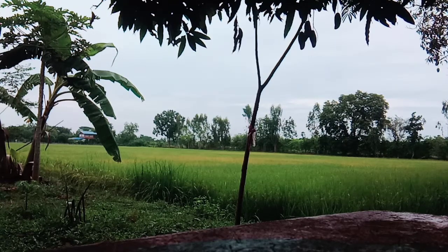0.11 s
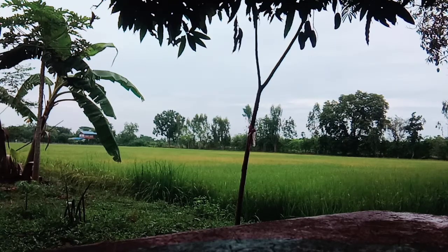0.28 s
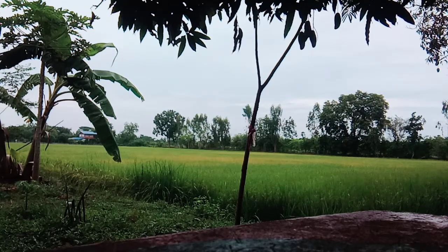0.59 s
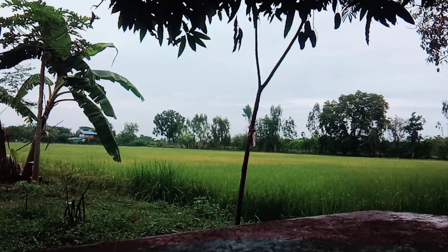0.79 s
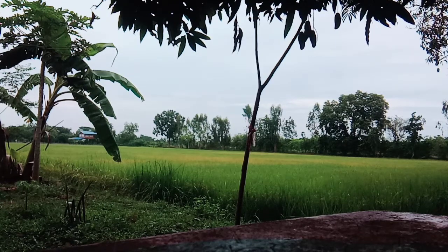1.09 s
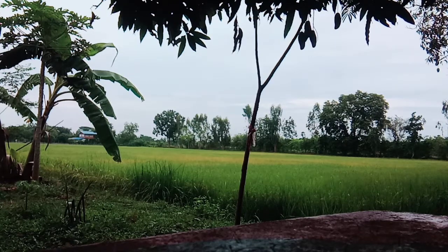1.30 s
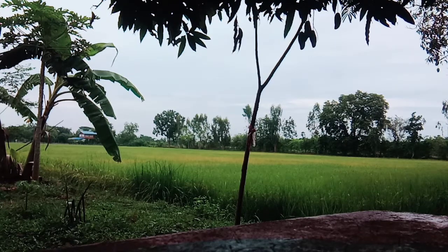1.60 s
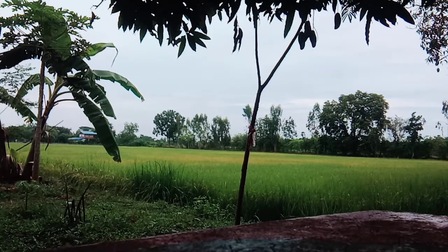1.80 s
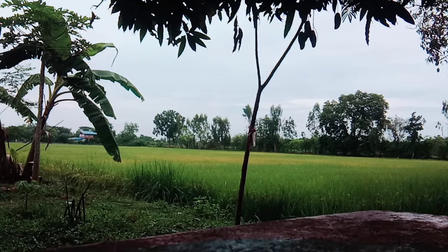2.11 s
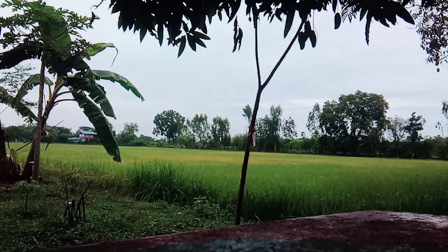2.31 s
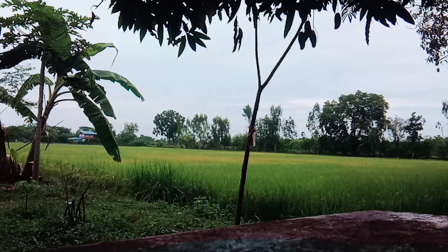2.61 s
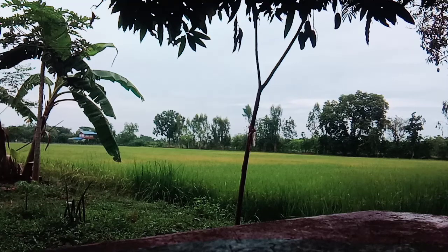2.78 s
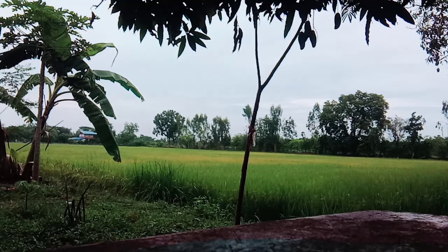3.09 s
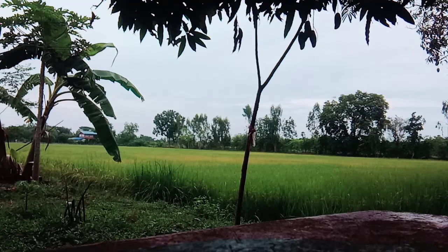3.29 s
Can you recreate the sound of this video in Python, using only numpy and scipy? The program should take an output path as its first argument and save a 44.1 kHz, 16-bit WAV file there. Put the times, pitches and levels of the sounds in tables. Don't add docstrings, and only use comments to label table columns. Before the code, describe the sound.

Sharp trilled bird chirps, four times, with far birds, doves and insects across open farmland.

```python
import sys
import numpy as np
from scipy import signal
from scipy.fft import rfft, irfft, next_fast_len
from scipy.io import wavfile
from scipy.ndimage import uniform_filter1d

SR = 44100
rng = np.random.default_rng(int(sys.argv[2]) if len(sys.argv) > 2 else 0)


def digitize_waveform(pressure):
    field = np.atleast_2d(pressure).T
    bounded = np.clip(field, -1, 1)
    quanta = np.round(bounded * 32767).astype(np.int16)
    wavfile.write(sys.argv[1], SR, quanta)


def decibels_to_gain(level_db):
    exponent = np.asarray(level_db, float) / 20
    return 10 ** exponent


N = 152145
TIME_S = np.arange(N) / SR


def walk(rate_hz):
    hold = int(SR / rate_hz)
    steps = np.repeat(rng.standard_normal(N // hold + 1), hold)
    return 1.3 * uniform_filter1d(uniform_filter1d(steps, hold), hold)[:N]


def set_level(x, db):
    return x * decibels_to_gain(db) / np.sqrt(np.mean(x ** 2))


def noise_band(hz, width_hz):
    f = np.fft.rfftfreq(next_fast_len(N), 1 / SR)
    re, im = rng.standard_normal((2, len(f)))
    bell = np.exp(-np.abs((f - hz) / width_hz) ** 2)
    return set_level(irfft((re + 1j * im) * bell)[:N], 0)


SHAKE, WOBBLE, HOARSE = walk(500), walk(300), walk(5000)
TRILL_PER_S = 225
TRILL = 2 * np.pi * np.cumsum(TRILL_PER_S * (1 + .2 * walk(100))) / SR


def even_glide(from_hz, to_hz):
    return lambda u: from_hz + (to_hz - from_hz) * u


def add_note(out, start_s, length_s, glide, db, edge=0.84, rasp=0., over_db=(), wobble_hz=0., trill=0.):
    trill_hz, trill_depth, trill_fade, hoarse_db = 290, .6, .5, -21.5
    i = int(max(start_s, 0) * SR)
    u = np.arange(min(int(length_s * SR), N - i)) / (length_s * SR)
    part = slice(i, i + len(u))
    beat = trill * (1 - trill_fade * u)
    pitch_hz = glide(u) + wobble_hz * WOBBLE[part] + trill_hz * beat * np.sin(TRILL[part])
    phase = 2 * np.pi * np.cumsum(pitch_hz) / SR
    shake = 1 + rasp * SHAKE[part] + trill_depth * beat * np.cos(TRILL[part])
    shake = shake + trill * decibels_to_gain(hoarse_db) * HOARSE[part]
    tone = np.sin(phase)
    for k, overtone_db in enumerate(over_db):
        tone = tone + decibels_to_gain(overtone_db) * np.sin((k + 2) * phase)
    fade = np.sin(np.pi / 2 * np.clip(np.minimum(u, 1 - u) / edge, 0, 1))
    out[part] += np.sqrt(2) * decibels_to_gain(db) * fade * shake * tone


def sing(notes, rasp, edge, wobble_hz):
    out = np.zeros(N)
    for start_s, length_s, from_hz, to_hz, db in notes:
        add_note(out, start_s, length_s, even_glide(from_hz, to_hz), db, edge, rasp, wobble_hz=wobble_hz)
    return out


def trees(x, wet_db, t60_s=.3):
    gap_s = 0.0045
    t = np.arange(SR // 2) / SR
    tail = rng.standard_normal(SR // 2) * decibels_to_gain(-60 * t / t60_s) * (t > gap_s)
    return x + signal.fftconvolve(x, tail * decibels_to_gain(wet_db) / np.sqrt(np.sum(tail ** 2)))[:N]


# start_s, lead_in_level_db
CHIRP_CALLS = [(0.315, -51.5), (1.364, -54.5), (2.093, -55), (3.012, -57.5)]
# start_s, length_s, from_hz, to_hz, level_db
CHIRP_FLICKS = [
    [(.313, 0.018, 4580, 4680, -42), (.328, .012, 4630, 5080, -36.5), (.343, 0.0082, 4860, 5040, -34),
     (.348, 0.0094, 3930, 4110, -41.5), (.3625, 0.019, 4595, 4566, -32), (.388, 0.037, 2916, 3573, -46)],
    [(1.364, .012, 4380, 5000, -52), (1.374, 0.008, 4540, 4600, -39), (1.387, 0.029, 4970, 4640, -41.5),
     (1.401, 0.025, 3546, 4100, -42), (1.414, 0.018, 4470, 4560, -34.5), (1.437, 0.0414, 3060, 3590, -45.5)],
    [(2.094, 0.022, 4620, 5000, -36.5), (2.11, 0.017, 5000, 5310, -34), (2.131, .016, 3840, 4520, -41.5),
     (2.144, 0.024, 4854, 4510, -35.5), (2.169, 0.041, 3155, 3630, -47.5)],
    [(3.015, 0.016, 4380, 4710, -44.5), (3.028, 0.021, 5040, 4980, -35), (3.047, .029, 3790, 4650, -39),
     (3.082, 0.013, 3060, 3400, -48), (3.098, 0.023, 3445, 3694, -42)],
]
# seconds_before_start, length_s, from_hz, to_hz, level_db (against lead_in_level_db)
LEAD_IN = [
    (.024, .015, 7600, 6900, -5),
    (.012, .012, 6800, 6200, -4),
    (.006, .018, 5350, 5800, 1),
]
# pitch_hz, width_hz, boost_db
BEAK = [(4560, 75, 1), (3500, 20, 7.5), (4990, 180, -9.5)]


def chirper():
    full_trill_hz, least_trill = 600, .5
    total = 0
    for (call_s, lead_db), flicks in zip(CHIRP_CALLS, CHIRP_FLICKS):
        call = np.zeros(N)
        for early_s, length_s, from_hz, to_hz, db in LEAD_IN:
            add_note(call, call_s - early_s, length_s, even_glide(from_hz, to_hz), lead_db + db,
                     rasp=.6, wobble_hz=200, trill=1)
        for start_s, length_s, from_hz, to_hz, db in flicks:
            trill = np.clip(abs(to_hz - from_hz) / full_trill_hz, least_trill, 1)
            add_note(call, start_s, length_s, lambda u: to_hz + (from_hz - to_hz) * np.exp(-2.5 * u), db,
                     edge=.2, rasp=.6 * trill, over_db=(-49, -48), wobble_hz=170 * trill, trill=trill)
        total = total + trees(call, -.4, t60_s=0.26)
    f = np.fft.rfftfreq(N, 1 / SR)
    beak_db = sum(db / (1 + ((f - hz) / width) ** 2) for hz, width, db in BEAK)
    return irfft(rfft(total) * decibels_to_gain(beak_db), N)


# start_s, length_s, from_hz, to_hz, level_db
NEAR_DOVE = [(1.515, .04, 1060, 1170, -54), (1.538, .035, 950, 955, -45), (1.553, .13, 1212, 1195, -43),
             (1.675, .085, 1185, 1120, -46), (1.778, .035, 950, 950, -49), (1.77, .045, 1190, 1060, -50),
             (1.82, .04, 1110, 1110, -46), (1.872, .03, 950, 960, -48), (1.874, .072, 1135, 1145, -43),
             (1.946, .055, 1130, 1010, -45), (1.99, .04, 980, 945, -49)]


def near_dove():
    return trees(sing(NEAR_DOVE, rasp=0.06, edge=0.078, wobble_hz=9.9), -6.5)


# start_s, length_s, top_hz, level_db
PIPER = [(.005, 0.02, 1126, -54.5), (0.082, 0.029, 1120, -53.5), (0.188, 0.061, 1202, -53),
         (0.328, 0.078, 1242, -54), (0.504, 0.097, 1220, -55.5), (0.707, 0.1, 1232, -54),
         (0.899, 0.12, 1227, -56), (1.096, 0.16, 1210, -54), (1.32, 0.13, 1234, -58)]


def piper():
    arch = .17
    out = np.zeros(N)
    for start_s, length_s, top_hz, db in PIPER:
        add_note(out, start_s, length_s, lambda u: top_hz * (1 - arch * (2 * u - 1) ** 2), db, edge=.2, rasp=.1)
    return trees(out, -8)


# start_s, length_s, from_hz, to_hz, level_db
WHISTLER = [(.75, 0.058, 3850, 3920, -59), (.81, 0.1, 3810, 3500, -66), (.91, 0.032, 2520, 2773, -54.5),
            (.95, 0.05, 2765, 2837, -55.5), (1.12, 0.13, 2190, 2360, -58.5), (1.2, 0.06, 2447, 2900, -56),
            (1.39, 0.047, 2335, 2330, -52.5), (1.47, 0.05, 2397, 2770, -52),
            (1.53, 0.082, 2786, 2710, -59.5), (1.7, 0.043, 2310, 2254, -54.5),
            (1.755, 0.1, 2400, 2720, -53.5), (1.88, 0.074, 2890, 3430, -60),
            (1.97, 0.033, 2540, 2590, -55.5), (2.74, 0.069, 3670, 3780, -65), (2.9, 0.026, 3790, 3810, -53),
            (3.36, 0.031, 2530, 2560, -58)]


def whistler():
    return trees(sing(WHISTLER, rasp=.2, edge=.2, wobble_hz=35), -2.3)


# start_s, length_s, from_hz, to_hz, level_db
FAR_DOVE = [(.59, 0.026, 710, 710, -74), (.845, 0.013, 714, 710, -60), (1.2, 0.089, 694, 781, -62),
            (1.3, 0.083, 780, 673, -66.5), (1.485, 0.11, 695.5, 725.6, -62.5),
            (1.76, 0.034, 617, 713, -55.5), (2.02, 0.054, 680, 714, -58.5), (2.15, 0.045, 755, 772, -57.5),
            (2.3, 0.03, 720, 644, -59), (2.57, 0.073, 709, 686, -58), (2.823, 0.036, 633, 739, -48),
            (3.095, 0.045, 680, 721, -54), (3.39, 0.038, 665, 735, -57)]


def far_dove():
    return trees(sing(FAR_DOVE, rasp=.15, edge=.22, wobble_hz=10), -0.15)


# start_s, length_s, centre_hz, width_hz, level_db
SCOLDS = [
    (0.203, 0.06, 3450, 890, -57.5),
    (0.782, 0.077, 2770, 1800, -52.5),
    (0.943, 0.066, 407, 261, -59),
    (0.972, 0.068, 620, 700, -53.5),
    (1.009, 0.019, 2050, 1100, -48),
    (1.951, 0.034, 4030, 1010, -47.5),
    (1.948, .09, 3200, 1500, -47.5),
    (2.848, 0.082, 3250, 1220, -53),
]


def scolds():
    scratch = decibels_to_gain(2.5 * walk(200))
    out = 0
    for start_s, length_s, hz, width_hz, db in SCOLDS:
        end_s = start_s + length_s
        burst = np.interp(TIME_S, [start_s, start_s + 0.0085, end_s, end_s + 0.022], [0.037, 0.86, 0.46, 0.026])
        out = out + decibels_to_gain(db) * burst * noise_band(hz, width_hz / 2)
    return trees(scratch * out, -1.3)


# start_s, length_s, pitch_hz, level_db
FROG = [
    (.906, .055, 295, -47),
    (.97, .06, 340, -57),
    (1.659, .027, 350, -44),
    (1.688, .02, 360, -47),
    (1.716, .03, 340, -55),
    (1.668, .02, 470, -54),
]


def frog():
    out = np.zeros(N)
    for start_s, length_s, hz, db in FROG:
        add_note(out, start_s, length_s, lambda u: hz * (1 + 0.07 * walk(66)[:len(u)]), db,
                 edge=.2, rasp=.3, over_db=(-24,))
    return trees(out, -7)


def chatter(low_hz, high_hz, count):
    out = np.zeros(N)
    for when, length, pitch, slide, faint in rng.random((count, 5)):
        hz = low_hz * (high_hz / low_hz) ** pitch
        add_note(out, when * (N - 1) / SR, 0.02034 + 0.0347 * length,
                 lambda u: hz * (1 + 0.265 * (slide - .5) * u), -6 * faint, edge=.3, rasp=.3, wobble_hz=hz / 40)
    return out


# time_s, low_voices_db, high_voices_db
CROWD = [(0, -63, -90), (.4, -64.5, -68), (.8, -68, -78.5), (1.2, -62.5, -68), (1.601, -63, -69.5),
         (2, -61.5, -71), (2.5, -65.5, -70.5), (3.102, -69, -71), (3.45, -94, -70.5)]


def crowd():
    time_s, low, high = np.array(CROWD).T
    low_db, high_db = np.interp(TIME_S, time_s, low), np.interp(TIME_S, time_s, high)
    voices = decibels_to_gain(low_db) * chatter(780.5, 1280.0, count=170) + decibels_to_gain(high_db) * chatter(2250, 4500, count=450)
    return trees(voices, 5, t60_s=.4)


# pitch_hz, width_hz, throbs_per_s, throb_db, level_db
INSECTS = [
    (4760, 330, 21, 1.1, -62),
    (6980, 480, 10.1, 2.3, -72.5),
    (8700, 500, 10.1, 2.5, -97),
    (10600, 750, 10.1, 1, -94),
]


def insects():
    out = 0
    for hz, width_hz, rate, throb_db, db in INSECTS:
        throb = np.sin(2 * np.pi * np.cumsum(rate * (1 + 0.071 * walk(3.6))) / SR)
        beat_db = throb_db * throb + 1.5 * walk(160)
        choir = 0
        for side in (-1, 1):
            drift = decibels_to_gain(1 * walk(4.97))
            choir = choir + drift * noise_band(hz + side * width_hz / 2, .62 * width_hz)
        out = out + decibels_to_gain(db - 2 + beat_db) * choir
    return out


# time_s, level_db
ENGINE = [(0, -70), (.35, -54), (.7, -55.5), (.9, -75), (1.3, -58), (1.7, -66.5), (2.2, -56), (3.05, -54),
          (3.3, -71)]


def engine():
    pitch_hz = 114.6 + 5.03 * walk(8)
    tone = np.sin(2 * np.pi * np.cumsum(pitch_hz) / SR)
    return np.sqrt(2) * decibels_to_gain(np.interp(TIME_S, *np.array(ENGINE).T) + 2 * walk(8.9)) * tone


def wash(shape, swell_db, flicker_db):
    hz, db = np.array(shape, float).T
    centres = np.geomspace(max(hz[0], 25), hz[-1], num=26)
    width = centres[1] / centres[0] - 1
    swell = walk(0.79)
    out = 0
    for c in centres:
        band_db = np.interp(np.log(c), np.log(hz), db) + swell_db * swell + flicker_db * walk(5.05)
        out = out + decibels_to_gain(band_db) * np.sqrt(c) * noise_band(c, 0.47 * width * c)
    return out


# pitch_hz, level_db (per Hz)
RUMBLE = [(18, -65.5), (30, -38.5), (50, -12), (113, -4.5), (190, -9), (231, -9.5), (420, -37),
          (550, -53.5), (920, -120)]


def rumble():
    return set_level(wash(RUMBLE, 0.75, 2.5), -52.5)


# pitch_hz, level_db (per Hz)
AIR = [(330, -7.5), (430, -17.5), (720, -9), (900, -7.5), (1230, 1), (1450, -6.5), (2800, 0), (4600, -10.5)]


def air():
    return set_level(wash(AIR, 0.67, 4.2), -59.5)


# pitch_hz, level_db (per Hz)
HISS = [(5000, -10), (6000, -9), (7500, -16.5), (8300, -15), (9500, -20)]


def hiss():
    return set_level(wash(HISS, .3, 0.86), -83)


def scene():
    near = chirper() + near_dove()
    far = piper() + whistler() + far_dove() + scolds() + frog() + crowd()
    background = insects() + engine() + rumble() + air() + hiss()
    return (near + far + background)[None]


def low_pass(x):
    return signal.sosfilt(signal.butter(12, 15500, fs=SR, output="sos"), x)


def record(dry):
    heard = dry + decibels_to_gain(-84.5) * rng.standard_normal(N)
    return low_pass(heard)


dry = scene()
out = record(dry)
digitize_waveform(out)
```